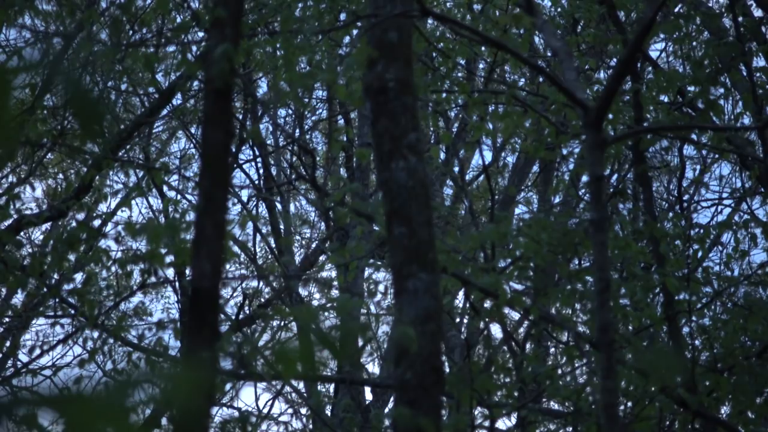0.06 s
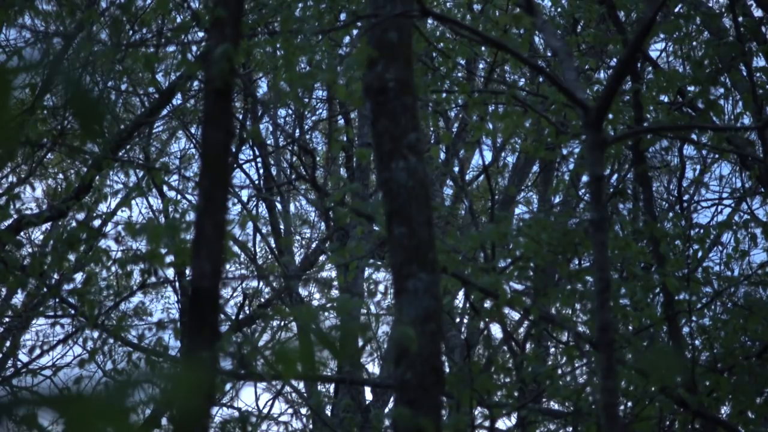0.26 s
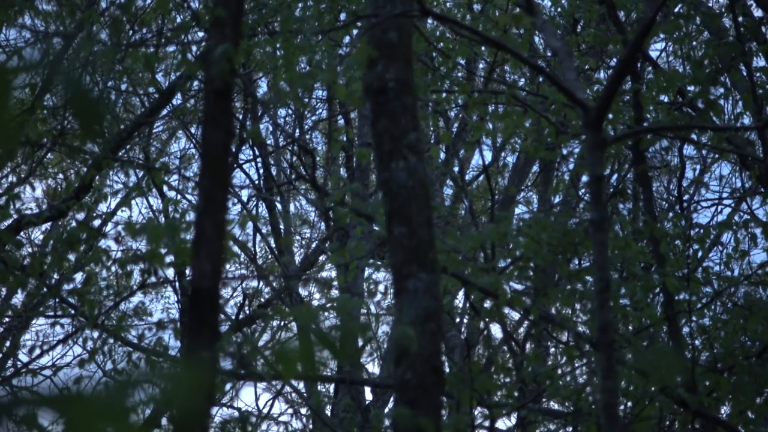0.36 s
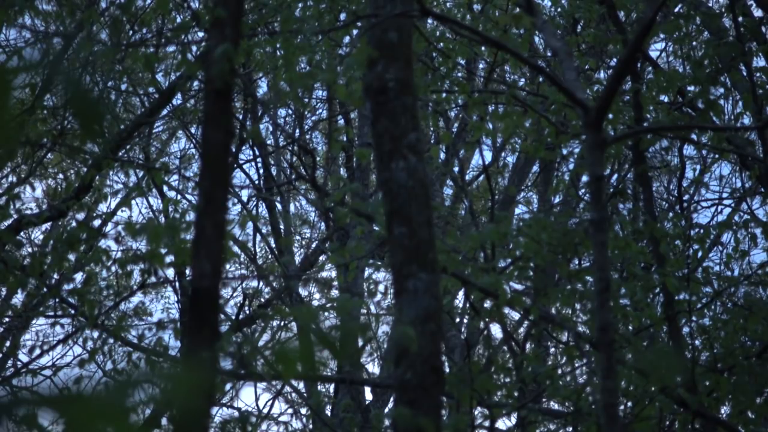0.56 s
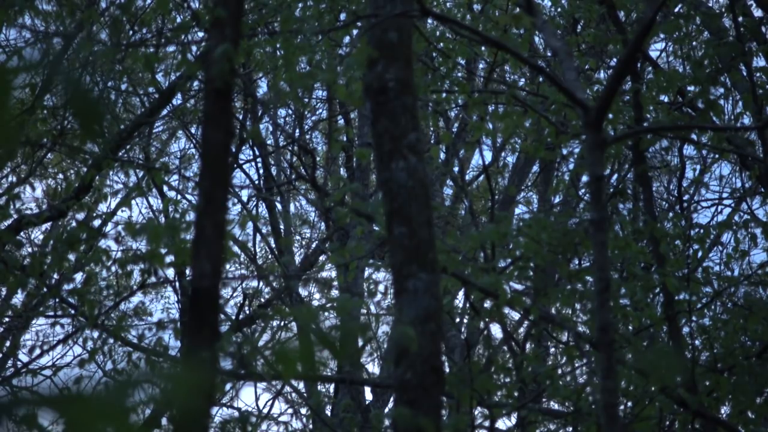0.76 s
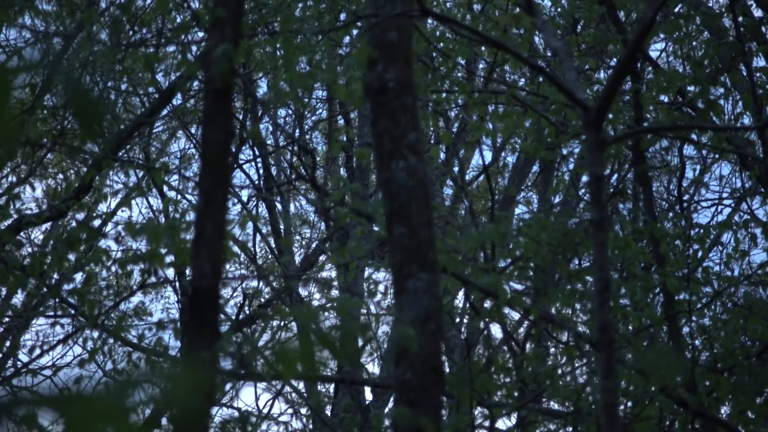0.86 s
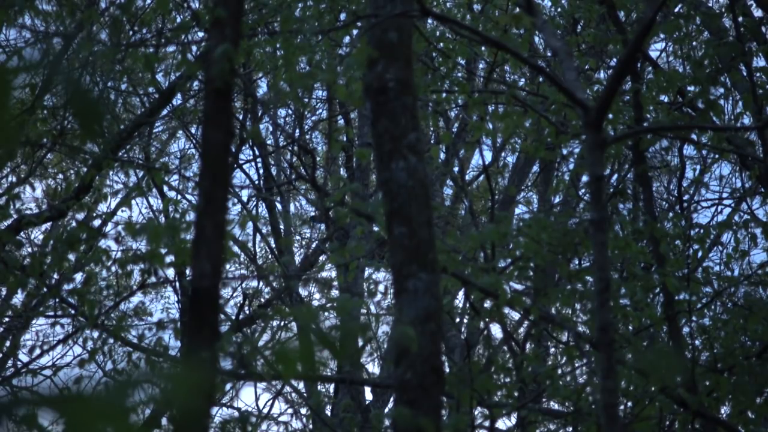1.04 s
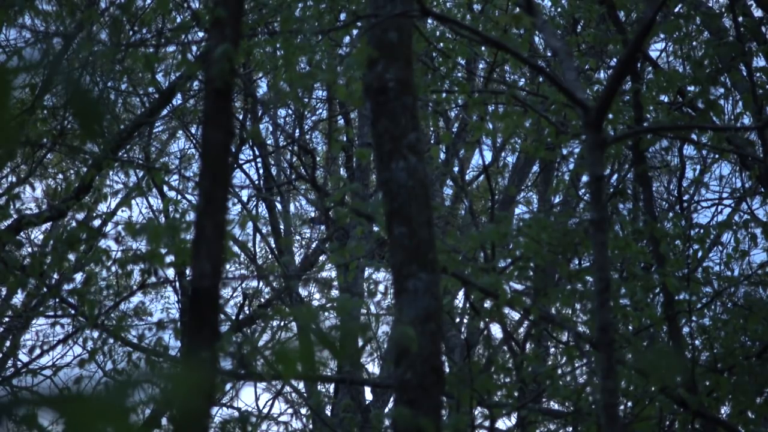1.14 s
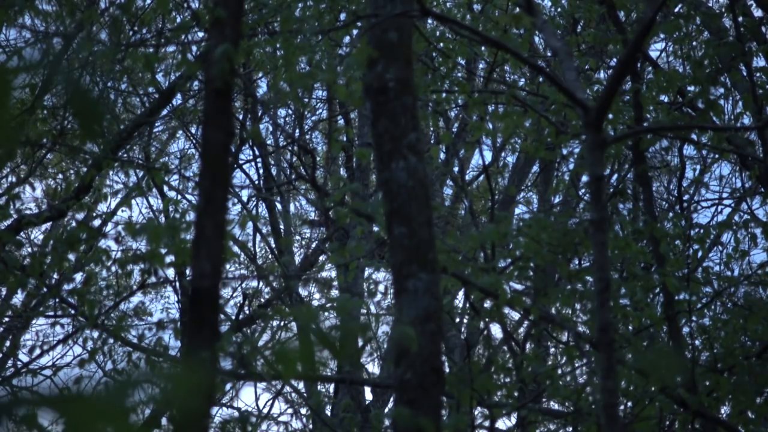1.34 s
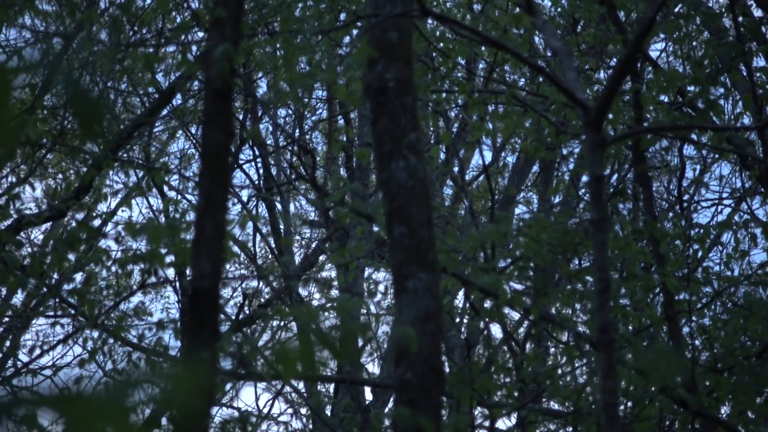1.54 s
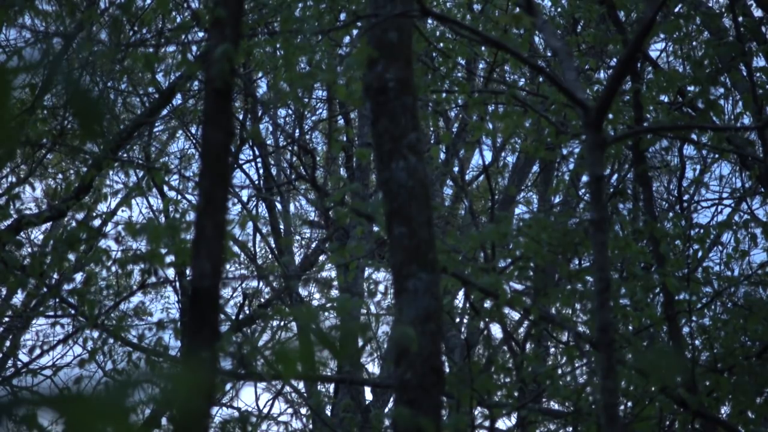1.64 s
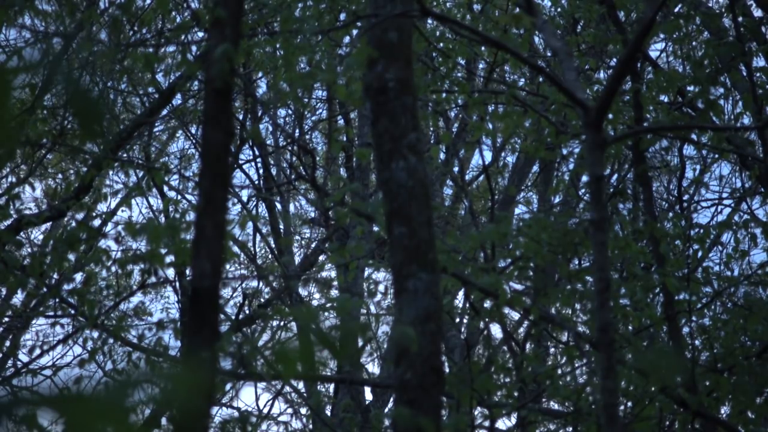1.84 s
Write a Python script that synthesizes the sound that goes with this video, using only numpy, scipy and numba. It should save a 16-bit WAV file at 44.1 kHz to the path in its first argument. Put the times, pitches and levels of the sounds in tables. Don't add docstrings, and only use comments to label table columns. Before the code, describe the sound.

Close owl call in a quiet wood: one quick hoot, then a held note that quavers downward and fades to breath.

```python
import sys
import numpy as np
from scipy import signal
from scipy.fft import rfft, irfft
from scipy.io import wavfile
from scipy.ndimage import uniform_filter1d
from numba import njit

SR = 44100
rng = np.random.default_rng(int(sys.argv[2]) if len(sys.argv) > 2 else 0)


def attenuation_scalar(level_db):
    decades = np.asarray(level_db, float) / 20
    return 10 ** decades


def wav_out(sig):
    wavfile.write(sys.argv[1], SR, np.round(np.clip(np.atleast_2d(sig).T, -1, 1) * 32767).astype(np.int16))


N = 83790

THROAT_CUT_HZ = 1287
UPPER_PATCHY_DB, PATCHES_PER_S = 2.5, 25
CATCH_S = 0.0088


def rms_one(x):
    return x / np.sqrt(np.mean(x ** 2) + 1e-20)


def in_time(rows, smooth_s=0.0017):
    at_s, *columns = np.transpose(sorted(rows))
    n = int(smooth_s * SR) + 1
    t = np.arange(N) / SR
    curves = [np.interp(t, at_s, column) for column in columns]
    return [uniform_filter1d(uniform_filter1d(curve, n), n) for curve in curves]


def bumps(at_s, width_s, edge=2):
    t = np.arange(N) / SR
    offset = (t - np.reshape(at_s, (-1, 1))) / np.reshape(width_s, (-1, 1))
    return np.exp(-0.5 * np.abs(offset) ** edge)


def drift(rate_hz):
    r = np.exp(-2 * np.pi * rate_hz / SR)
    wander = signal.lfilter([1], [1, -2 * r, r * r], rng.standard_normal(N + SR))
    return rms_one(wander[SR:])


def peak(x, hz, width_hz, gain_db):
    a, w = attenuation_scalar(gain_db / 2), 2 * np.pi * hz / SR
    q = np.pi * width_hz / SR
    return signal.lfilter([1 + q * a, -2 * np.cos(w), 1 - q * a], [1 + q / a, -2 * np.cos(w), 1 - q / a], x)


def cut(x, hz, kind, order=2):
    return signal.sosfilt(signal.butter(order, hz, kind, fs=SR, output="sos"), x)


@njit
def resonate(x, hz, width_hz, sr):
    y, r = np.zeros(len(x)), np.exp(-np.pi * width_hz / sr)
    for i in range(2, len(x)):
        drive = (1 - r * r) / 2 * (x[i] - x[i - 2])
        y[i] = drive + 2 * r * np.cos(2 * np.pi * hz[i] / sr) * y[i - 1] - r * r * y[i - 2]
    return y


def hiss():
    return attenuation_scalar(-78) * cut(rng.standard_normal(N), 9050, "high", order=1)


def wood():
    # hz, level_db
    floor_spectrum = [(25, -11), (82, -1), (200, -10), (350, -18), (600, -26), (1300, -20.5), (3000, -24.5),
                      (6000, -61.5)]
    # hz, width_hz, level_db
    floor_bands = [(524, 30, -62), (1069, 40, -61.5)]
    f = np.maximum(np.arange(N // 2 + 1) * SR / N, 1)
    hz, db = np.transpose(floor_spectrum)
    shape = attenuation_scalar(np.interp(np.log(f), np.log(hz), db))
    floor = rms_one(irfft(rfft(rng.standard_normal(N)) * shape, N))
    wash = 0
    for hz, width_hz, level_db in floor_bands:
        band = rms_one(resonate(rng.standard_normal(N), np.full(N, float(hz)), width_hz, SR))
        wash = wash + attenuation_scalar(level_db + 0.84 * drift(34)) * band
    return attenuation_scalar(-60.5) * floor + wash


def bird():
    # at_s, pitch_hz, level_db
    chip = [
        (.686, 4700, -71),
        (.692, 5800, -60),
        (.701, 6650, -66),
        (.71, 5630, -71.5),
        (.718, 5110, -63.5),
        (.727, 5150, -73),
    ]
    hz, db = in_time(chip, 0.002)
    t = np.arange(N) / SR
    sounding = (t > chip[0][0]) & (t < chip[-1][0])
    return attenuation_scalar(db) * sounding * np.sin(2 * np.pi * np.cumsum(hz) / SR)


def trees(x):
    echo_db, t60_s = -29, 1
    t = np.arange(SR) / SR
    tail = rng.standard_normal(SR) * attenuation_scalar(-60 * t / t60_s) * (t > 0.015)
    return attenuation_scalar(echo_db) * signal.fftconvolve(x, tail / np.linalg.norm(tail))[:N]


def owl_breath():
    # at_s, level_db, pitch_factor
    breath = [
        (1.12, -48, 0.93),
        (1.153, -39, 1.3),
        (1.175, -37.5, 1),
        (1.185, -50.5, 1.192),
        (1.35, -51.5, 1.17),
        (1.4, -54, 1.08),
        (1.55, -57, 1.02),
        (1.9, -58.5, .98),
    ]
    # at_s, gain_db, width_s
    flaps = [(1.24, 5, .008), (1.291, 11, .007), (1.325, 7, .016), (1.352, 5, .006), (1.419, 11, .008),
             (1.454, 6, .007), (1.487, 5, .005), (1.51, 7, .01), (1.577, 14, .007), (1.652, 9, .011),
             (1.717, 14, .008), (1.776, 8, .005), (1.79, 8, .006), (1.853, 13, .006)]
    # hz, width_hz, level_db, share of the pitch-factor change
    throat_rings = [(576, 38.4, 2, 0.98), (953, 81, 1.5, 1.63), (1696, 330, -13.5, 0.59),
                    (2490, 120, -20.5, 0.13), (2630, 81, -20.5, -0.49), (3292, 96, -10.5, -0.188),
                    (3546, 200, -18, 0.27), (4320, 220, -24.5, 0.75), (5280, 200, -30.5, 0.44)]
    earlier_db, earlier_t60_s = -51, 0.28
    t = np.arange(N) / SR
    db, factor = in_time(breath)
    at_s, gain_db, width_s = np.transpose(flaps)
    puff_db = gain_db @ bumps(at_s, width_s)
    onset = np.clip((t - breath[0][0]) / 0.0067, 0, 1)
    level = attenuation_scalar(db + puff_db) * onset + attenuation_scalar(earlier_db - 60 * t / earlier_t60_s)

    air = cut(rng.standard_normal(N), 5100, "low", order=4)
    rings = 0
    for k, (hz, width_hz, ring_db, share) in enumerate(throat_rings):
        ring = resonate(air, hz * (1 + (factor - 1) * share), width_hz, SR)
        rings = rings + (-1) ** k * attenuation_scalar(ring_db + 1.5 * drift(18)) * ring

    lowest_hz = throat_rings[0][0] * factor
    pips = attenuation_scalar(-8) * puff_db * np.sin(2 * np.pi * np.cumsum(lowest_hz) / SR)
    return level * rms_one(rings) + attenuation_scalar(db) * pips


def membranes():
    # at_s, pitch_hz, drive_db, overtone_loss_db_per_octave
    short_hoot = [
        (.187, 231.1, -19, 12.5),
        (.209, 368, -19.5, 5.5),
        (.228, 470, -19.5, 6),
        (.236, 531, -23, 4.5),
        (.252, 531, -25.5, 7),
        (.264, 604, -18.5, 12.5),
        (.286, 581.6, -22, 9.5),
        (.3, 382, -21, 5.5),
        (.32, 245.5, -23.5, 5.5),
        (.343, 148, -17, 9.5),
    ]
    second_hoot = [
        (0.517, 237.8, -23.5, 8.2),
        (0.539, 406.3, -17, 6.56),
        (0.559, 477.5, -20.5, 5.7),
        (0.579, 494.7, -21, 8.3),
        (0.599, 496.5, -21, 7.53),
        (0.609, 424, -17.5, 8),
        (0.631, 281, -22, 4.7),
        (0.645, 201.4, -25, 8.2),
    ]
    held_note = [
        (0.65, 211.6, -27, 3.2),
        (0.66, 250.2, -26.5, 4.9),
        (0.67, 356.3, -16, 7.8),
        (0.68, 462.5, -22, 3.7),
        (0.7, 587.4, -21.5, 14.8),
        (0.72, 594, -21, 10),
        (0.82, 597.7, -21.5, 9),
        (0.86, 578.3, -24, 7),
        (0.882, 557.5, -25, 6.4),
    ]
    trill = [
        (0.888, 500, -21, 11.1),
        (0.894, 404.6, -16, 11),
        (0.911, 414, -19, 8.2),
        (1.001, 362.2, -19.5, 9.7),
        (1.045, 343.9, -17.5, 10.5),
        (1.081, 310.9, -23, 8),
        (1.109, 250, -25, 5.6),
        (1.124, 192, -25, 6.9),
        (1.141, 136.6, -29, 3.26),
    ]
    # at_s, pitch_share_lost
    catches = [
        (0.894, 0.11),
        (.932, 0.24),
        (0.976, 0.19),
        (1.023, 0.18),
        (1.062, 0.16),
    ]
    # start_s, end_s, rise_s, fall_s
    sounding = [
        (.186, .345, 0.008, .03),
        (0.514, 1.159, 0.0087, 0.038),
    ]
    smooth_hz, smooth_span_hz, smooth_loss_db = 500, 4, 1.5
    jitter, trill_jitter, creak_jitter = 0.002, 0.005, 0.15
    t = np.arange(N) / SR
    hz, db, loss_db = in_time(short_hoot + second_hoot + held_note + trill)
    catch_s, share = np.transpose(catches)
    catch = bumps(catch_s, CATCH_S, edge=3)
    trilling = t > catch_s[0]
    hz = hz * (1 - share @ catch)
    creak = np.clip(1 - hz / 216, 0, 1)
    hz = hz * (1 + (jitter + trill_jitter * trilling + creak_jitter * creak) * drift(86))

    smooth = 1 / (1 + np.exp((smooth_hz - hz) / smooth_span_hz))
    loss_db = loss_db - 1.5 * catch.sum(0) + smooth_loss_db * smooth
    gate = 0
    for start_s, end_s, rise_s, fall_s in sounding:
        gate = gate + np.clip((t - start_s) / rise_s, 0, 1) ** 2 * np.clip((end_s - t) / fall_s, 0, 1)
    level = gate * attenuation_scalar(db - 2.5 * catch.sum(0) + 0.5 * trilling * drift(100))
    creaking = (hz < 270) & (t > catch_s[-1] + 0.03)
    thumping = t > catch_s[0] - CATCH_S
    return hz, loss_db, level, creaking, thumping


def windpipe(x):
    # hz, width_hz, gain_db
    throat = [(194, 240, -3.5), (296.3, 85.5, -10), (343, 270, 1), (541, 333, 8), (1042, 45, -19),
              (1305, 710, 6), (1400, 100, 3)]
    for row in throat:
        x = peak(x, *row)
    return signal.sosfiltfilt(signal.butter(5, THROAT_CUT_HZ, fs=SR, output="sos"), x)


def open_beak(blown):
    # hz, width_hz, level_db
    beak_rings = [(1800, 96, -5.5), (2300, 95, 8.5), (3130, 200, -0.5), (3800, 92, 9.5), (4500, 400, -33),
                  (5900, 170, -28.5), (10400, 500, -24.5), (11700, 500, -22)]
    total = 0
    for hz, width_hz, level_db in beak_rings:
        ring = resonate(blown, np.full(N, float(hz)), width_hz, SR)
        total = total + attenuation_scalar(level_db + UPPER_PATCHY_DB * drift(PATCHES_PER_S)) * ring
    return total


def owl_voice():
    hz, loss_db, level, creaking, thumping = membranes()
    phase = 2 * np.pi * np.cumsum(hz) / SR
    overtones = np.array([attenuation_scalar(-loss_db * np.log2(k)) * (k * hz < 5000) * np.cos(k * phase)
                          for k in range(1, 25)])
    gated_air = (1 + np.cos(phase)) * rng.standard_normal(N)
    tone = windpipe(level * (overtones.sum(0) + attenuation_scalar(-46.5 - loss_db) * gated_air))

    wavering = sum(part * attenuation_scalar(UPPER_PATCHY_DB * drift(PATCHES_PER_S)) for part in overtones[2:])
    upper = cut(cut(level * wavering, 3370, "low", order=4), THROAT_CUT_HZ, "high", order=4)
    air = level * attenuation_scalar(-29.5 - 2 * (loss_db - 5)) * gated_air
    beak = open_beak(air * attenuation_scalar(7.5 * creaking) + attenuation_scalar(-26) * upper)
    rumble = rms_one(cut(rng.standard_normal(N), 119, "low"))
    thump = attenuation_scalar(-33.5) * level * thumping * rumble
    return tone + attenuation_scalar(-27) * upper + beak + thump + attenuation_scalar(-42.5) * air


def scene():
    voice = owl_voice()
    return (voice + trees(voice) + owl_breath() + wood() + bird() + hiss())[None]


def roll_off(x):
    return signal.sosfilt(signal.butter(12, 15610, fs=SR, output="sos"), x)


def record(dry):
    mix = signal.sosfilt(signal.cheby2(12, 70, 17000, fs=SR, output="sos"), dry)
    return roll_off(mix)


dry = scene()
out = record(dry)
wav_out(out)
```